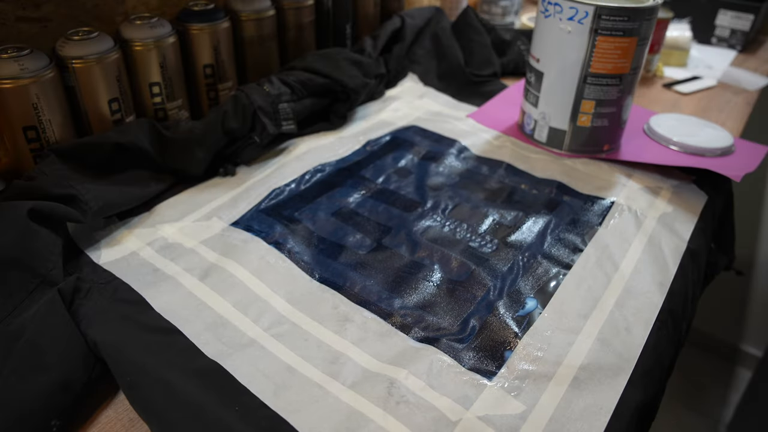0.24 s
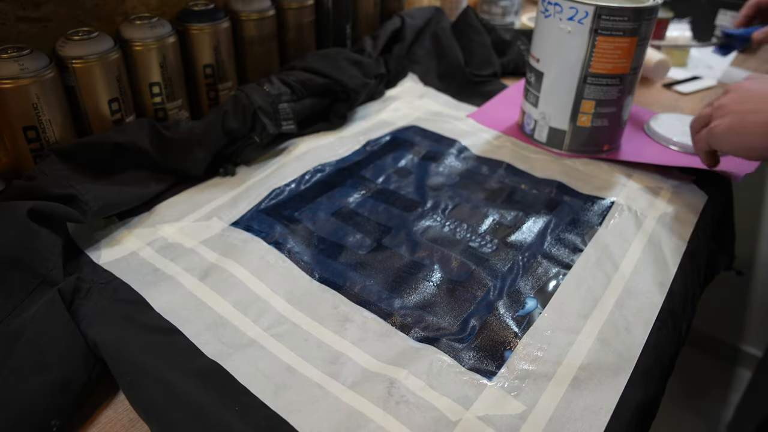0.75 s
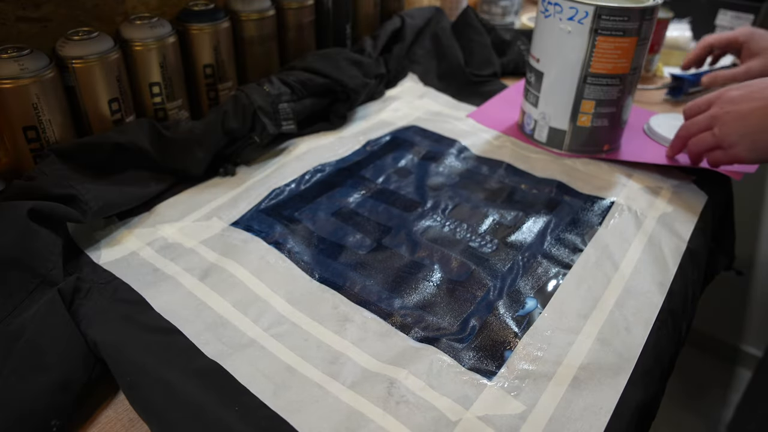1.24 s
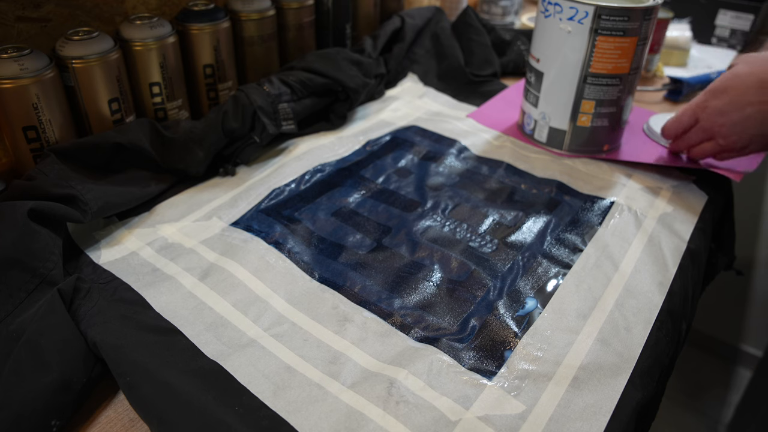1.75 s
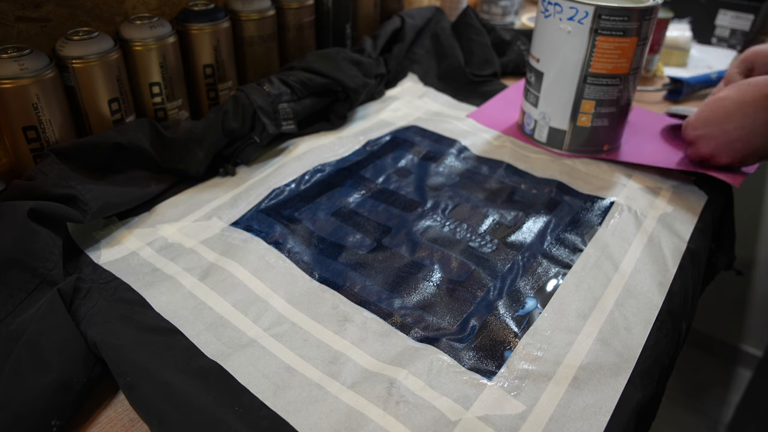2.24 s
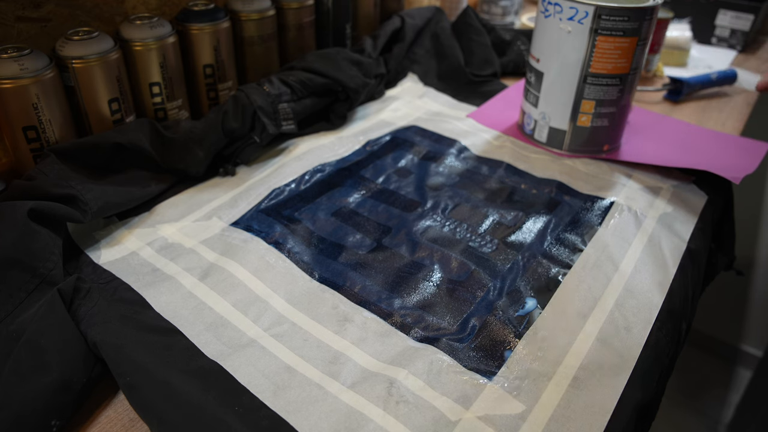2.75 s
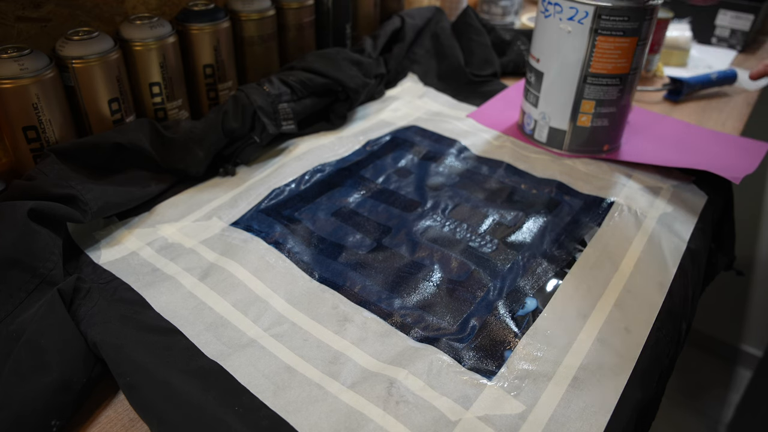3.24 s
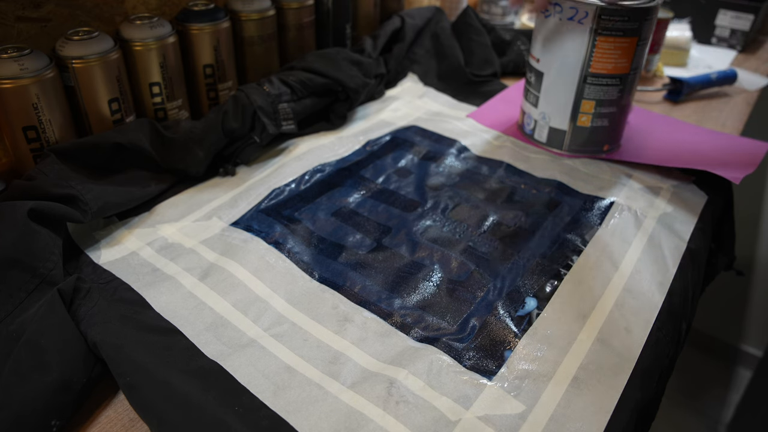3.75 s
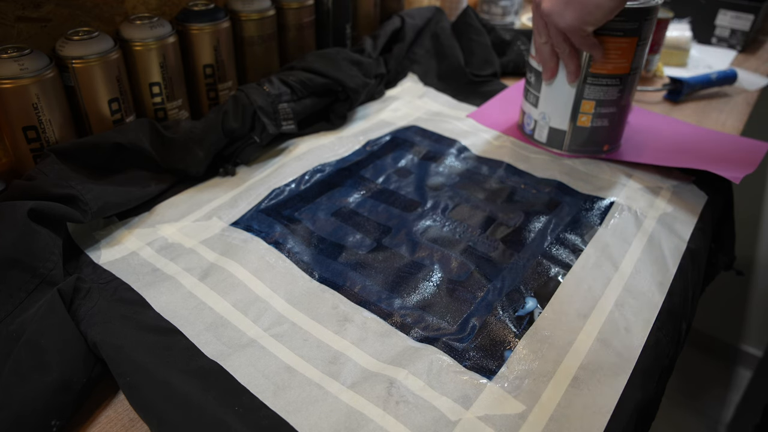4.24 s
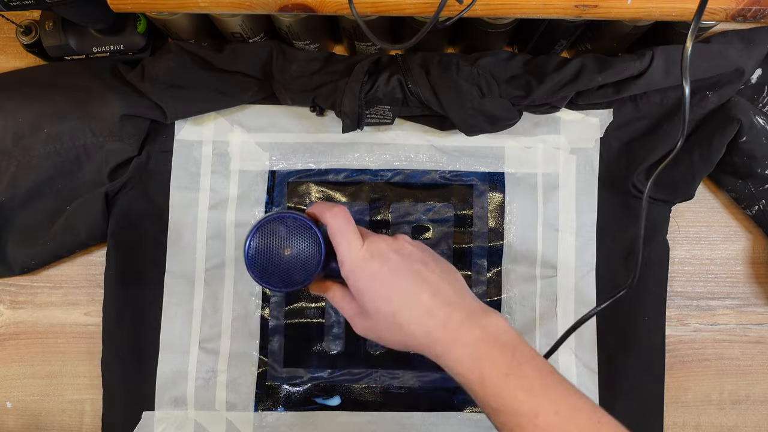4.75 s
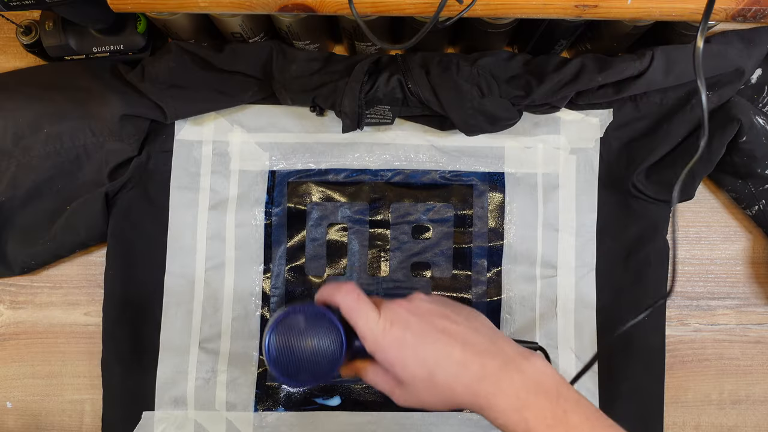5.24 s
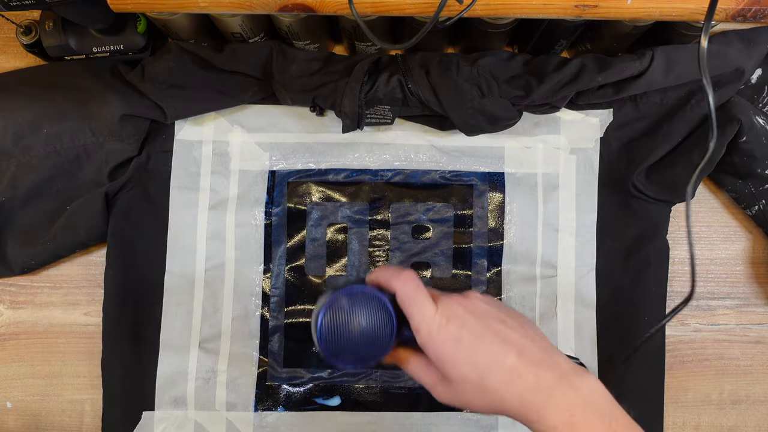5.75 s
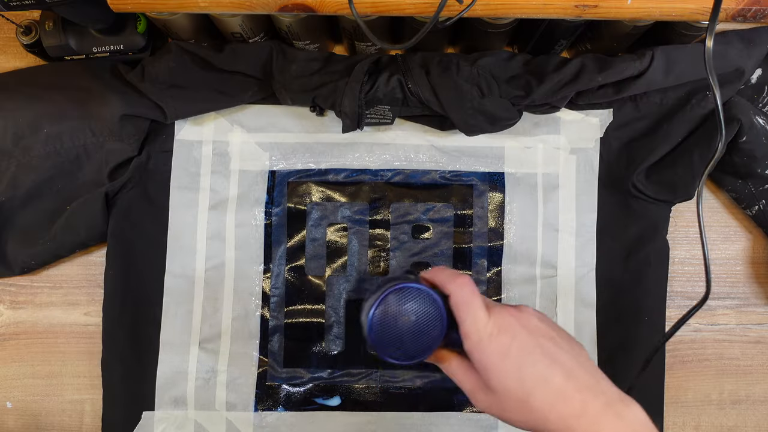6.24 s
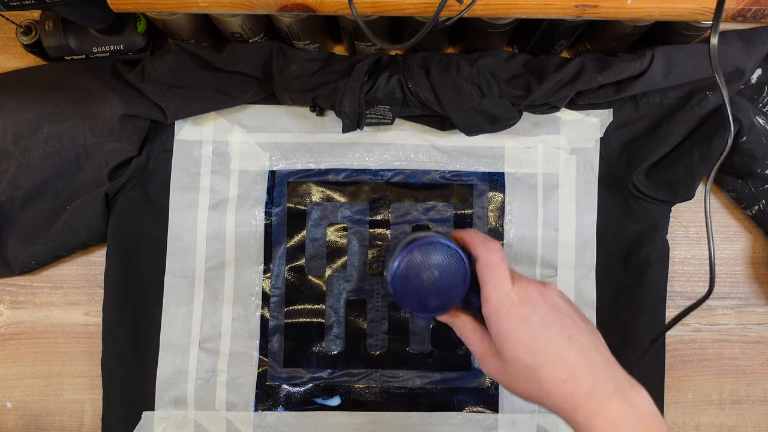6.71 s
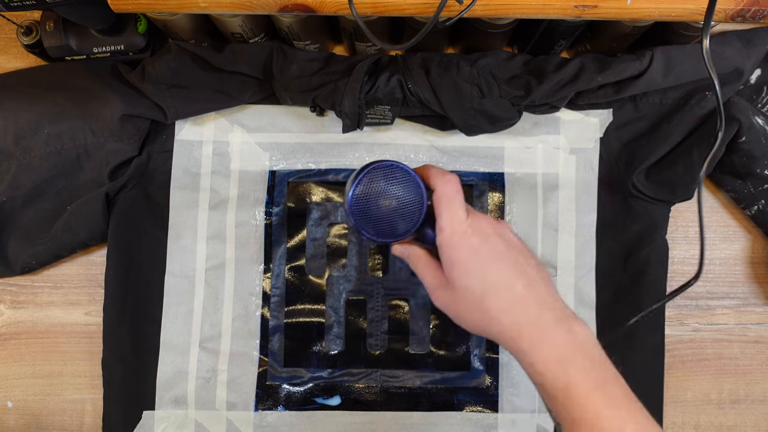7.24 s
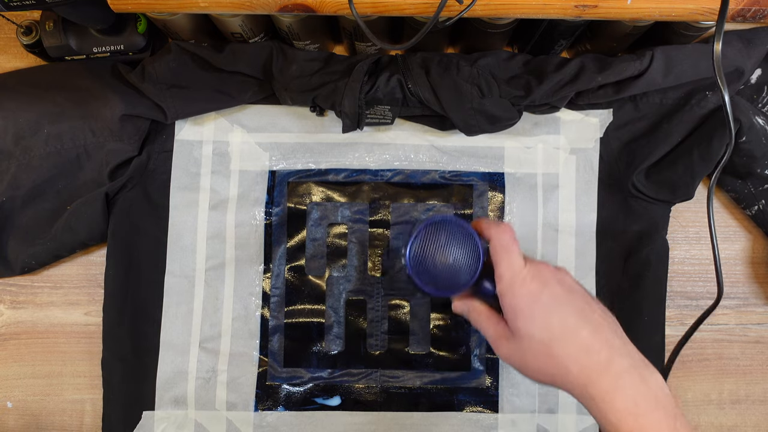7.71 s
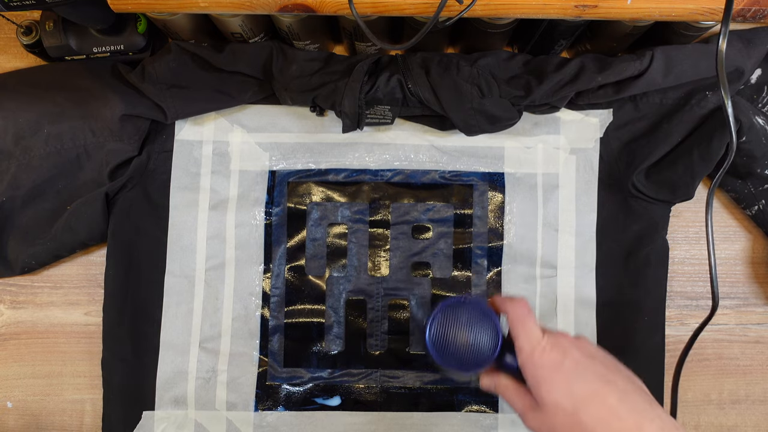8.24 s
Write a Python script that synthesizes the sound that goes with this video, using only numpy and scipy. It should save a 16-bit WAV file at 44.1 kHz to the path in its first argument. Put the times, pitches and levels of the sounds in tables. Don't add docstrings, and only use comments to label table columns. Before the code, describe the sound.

At a quiet workshop table, light handling and a ringing metal lid give way abruptly to a hollow knock and steady, whining hair dryer blast.

```python
import sys
import numpy as np
from scipy import signal
from scipy.fft import rfft, irfft
from scipy.io import wavfile
from scipy.ndimage import uniform_filter1d

SR = 44100
rng = np.random.default_rng(int(sys.argv[2]) if len(sys.argv) > 2 else 0)


def transcribe(u):
    v = np.clip(np.atleast_2d(u).T, -1, 1)
    q = np.round(v * 32767).astype(np.int16)
    wavfile.write(sys.argv[1], SR, q)


def volts_from_db(level):
    exponent = np.asarray(level, float) / 20
    return 10 ** exponent


N = 373968
T = np.arange(N) / SR
CUT_S, KNOCK_S = 4.4712, 4.5272

# start_s, length_s, level_db, brightness_db per band, low_grains_db
RUSTLE = [(-.05, 0.23, -61, 4, -1), (0.21, 0.24, -62, 2.5, 5), (.5, 0.28, -64.5, -4, 2),
          (0.697, 0.19, -56.5, 5, -9), (0.9, 0.22, -61, -4, 1), (1.154, 0.13, -53, 1, 3),
          (1.36, 0.32, -53, -3, 6), (1.64, 0.041, -57, 1, 2), (1.72, 0.24, -69, -6, -8),
          (1.931, 0.12, -54.5, 2.5, -6), (2.04, 0.19, -56.5, 4.5, -6), (2.304, 0.046, -54, 4, 0),
          (2.358, .016, -65, 16, -14), (2.42, 0.18, -66.5, -0.5, 6), (3.2, 0.094, -68, -17, 17),
          (3.075, 0.085, -57, -12, 3), (3.481, 0.11, -66.5, 6, -4), (3.82, 0.21, -67.5, 4, -4),
          (4.035, 0.17, -57, -6, 5.5), (4.2, 0.18, -61, -1, 1)]
CLOTH_DB = [-12.5, -1, -7.5, -26]
# pitch_hz, density_db per Hz
SHOP = [(15, -26), (25, 0.5), (166, -6.5), (476, -1.5), (887, -9.5), (1290, -12.5), (3250, -18),
        (4140, -18), (14800, -36), (16000, -25)]
# start_s, peak_db, ring_hz, upper_ring_hz, upper_ring_db
TICKS = [(0.078, -36.5, 1090, 2050, -22), (0.095, -40, 1080, 2900, -3), (0.119, -18, 1240, 2030, -5),
         (0.1189, -21.5, 1950, 2700, -27), (0.169, -41, 1750, 2830, 0), (0.224, -45, 1060, 2850, -17),
         (.283, -58, 1300, 2200, 0), (0.313, -42.5, 912, 3020, -23), (0.374, -56.5, 501, 2640, 7),
         (0.419, -44, 458, 2610, -13), (0.469, -33, 1120, 2050, -30), (0.473, -37, 1180, 2050, -30),
         (.501, -40, 910, 2050, -16), (0.509, -32.5, 1330, 2500, 1.5), (0.544, -31, 1110, 2300, -15),
         (.548, -37, 1220, 2300, -25), (0.696, -33, 1350, 2310, -20), (1.099, -48, 670, 2430, 7.5),
         (1.195, -28.5, 1250, 2000, -8), (1.222, -36, 1400, 2050, -6), (1.229, -36, 1270, 2050, -20),
         (2.243, -31.5, 1100, 2000, -20), (3.453, -49, 1690, 2650, -10), (3.813, -45, 1310, 2400, -7),
         (3.955, -43, 1600, 2300, -14), (3.961, -42, 1430, 2300, -20), (4.033, -53, 1400, 2300, -10),
         (4.372, -42, 1650, 3560, -2.5), (4.398, -42, 905, 2360, -20)]
# start_s,
# peak_db, thump_hz, edge_db, deep_thud_db
BUMPS = [(0.329, -57, 207, -11, 6), (0.779, -52.5, 213, 5, -13), (1.046, -56, 336, -5, -21),
         (1.598, -44.5, 185, 1, 1), (1.66, -47, 90, -4, 0), (1.77, -60, 85, -6, 0),
         (3.2, -54, 340, -12, -20), (3.262, -50, 340, -10, -22), (3.287, -37, 326, -15, -26),
         (3.301, -41, 310, -20, -15), (3.329, -46.5, 252, -22, -5), (3.457, -41, 235, -16.5, -30),
         (3.487, -46, 230, -21, -27), (3.807, -39.5, 333, -1.5, -8), (3.813, -42, 353, -5, -5),
         (3.949, -35, 200, -0.5, -10), (3.956, -33.5, 175, -8.5, -7), (4.039, -55, 328, 1, -2),
         (4.111, -51, 336, -3, -5), (4.375, -55.5, 252, 10, 0)]
# start_s, peak_db
CABLE = [
    (4.751, -52.5),
    (5.078, -57),
    (5.859, -51.5),
]
# pitch_hz, level_db, t60_s
ROLLER = [(84, -2, 0.13), (182, -3, 0.12), (350, -7.5, 0.1), (606, -7.5, 0.05), (963, -13, 0.059),
          (1120, -10.5, 0.034), (1530, -11, 0.031), (2210, -11.5, 0.052), (2940, -7, 0.033),
          (3880, -20, 0.044), (4850, -26, 0.018), (5780, -16.5, 0.071), (6300, -19, 0.05),
          (7120, -18.5, 0.03)]
# start_s, length_s, grind_db, hiss_db
DRAG = [
    (1.7, 0.043, -53, -85),
    (1.75, .05, -56, -85),
    (1.8, 0.053, -59, -85),
    (1.872, .04, -57, -87),
    (1.94, 0.063, -63, -64),
    (2.046, 0.16, -81, -57.5),
    (2.221, 0.018, -41, -65),
    (2.242, 0.012, -44, -73),
    (2.265, 0.02, -46, -77),
    (2.283, 0.048, -34, -47),
]
# start_s, peak_db
LID_TAPS = [
    (2.3317, -23.5),
    (2.3366, -27),
    (2.3489, -28),
    (2.368, -43),
]
# pitch_hz, level_db, t60_s
RIM = [(602, -10, .15), (910, -11, 0.14), (1276, 1, .06), (1502, -14, .2), (1620, -3.5, .22),
       (2014, -9, .09), (2870, -20, .15), (3750, -14, .04)]
# start_s, peak_db
LID_BLOWS = [
    (2.9413, -5),
    (3.4535, -54),
]
# pitch_hz, level_db, t60_s
LID = [(484, -7.5, .36), (985, -12.5, .2), (1140, -8, 0.15), (1279, -4.5, 0.22), (1378, -10, .25),
       (1617, -1, 0.35), (1965, -13, .19), (2400, -4.5, 0.28), (2570, 0, .28), (2939, -9.5, .22),
       (3054, -7, .33), (3155, -11, 0.13), (3759, -2, 0.27), (3994, -4, 0.32), (4476, -16, 0.19),
       (5152, -12.5, .2), (6000, -13, 0.26), (6476, -15, 0.24), (6670, -12.5, .22), (7806, -26, 0.15)]
# start_s, pitch_hz, level_db
DRYER = [(4.48, 1387, -32), (4.72, 1390, -34), (5.04, 1396, -30), (5.17, 1389, -34), (5.3, 1388, -32),
         (5.37, 1383, -37), (5.56, 1382, -35), (5.8, 1379, -37), (6.3, 1376, -38), (6.7, 1374, -36),
         (6.8, 1373, -32), (7.02, 1374, -31), (7.3, 1378, -32.5), (7.6, 1384, -30.5), (7.88, 1385, -36),
         (7.98, 1385, -32.5), (8.48, 1379, -36)]
# start_s, level_db, width_s
NULLS = [(4.74, -2, 0.017), (5.17, -3, .035), (5.75, -5, 0.016), (6.03, -3, 0.043), (6.3, -8, .015),
         (6.742, -13, .015), (6.89, -8, 0.04), (7.11, -19, 0.018), (7.145, -8, .018), (7.2, -2, 0.01),
         (7.4, -13, 0.023)]
# multiple of shaft rate, level_db against the blade tone, smear_rad, flutter_db
WHINE = [(1, -19.5, 0.39, 3.5), (5, -7, 0.84, -0.5), (8, -10.5, 0.69, 1), (11, -14, 1.2, 1.5),
         (14, -17.5, 0.44, 2.5), (21, -21, 1.2, 2.5), (28, -25, .9, 4.5)]
# pitch_hz, density_db per Hz
AIR = [(35, -58), (60, -33), (140, -23.5), (250, -15), (520, -8), (800, -4.5), (1250, -4.5), (2000, -7),
       (3200, -13.5), (6500, -18.5), (8800, -26), (10000, -29.5), (13500, -29.5), (16000, -41)]
# pitch_hz, width_hz, level_db
BARREL = [(780, 72, 5.5), (895, 60, 4.5), (1100, 110, 2), (1330, 60, -1.5), (1510, 99, -2.5),
          (2970, 97, 4.5), (3464, 180, 4.5), (4060, 270, 6.5), (4830, 220, 4.5), (5690, 1000, 4),
          (8640, 1850, 8.5)]
# start_s, pitch_hz, level_db against the air,
# share cancelled just below
GAP = [(4.47, 2256, -5.5, 0.18), (5.0, 2132, -1, 0.14), (5.5, 2034, -4, 0.37), (6.0, 2038, 0, 0.62),
       (6.3, 2104, 1, .7), (6.6, 2242, -4, 0.63), (6.9, 2300, -7, 0.41), (7.05, 1956, -5, .1),
       (7.25, 2090, 3, 0.65), (7.5, 2268, -2.5, 0.38), (8.0, 2263, -2, 0.5), (8.2, 2360, 1.5, 0.36),
       (8.48, 2154, -5, 0.16)]
# pitch_hz, level_db, t60_s
BLOW = [(700, 9, 0.019), (1660, -4.5, 0.068), (1250, -6, 0.02), (1990, -6, 0.036), (2270, -2.5, 0.018),
        (3380, -10.5, 0.035), (4330, -16, .012), (252, -16, 0.017), (56.3, -29, 0.5), (30, -23, 0.27)]
# start_s, peak_db
SLAPS = [(4.538, -10), (4.5525, -5), (4.566, -11), (4.5752, 2.5), (4.584, -7), (4.597, -13), (4.606, -11),
         (4.6155, -6), (4.626, -14), (4.644, -20), (4.653, -21), (4.669, -21), (4.681, -18)]
# pitch_hz, density_db per Hz
KNOCK_BODY = [(24, -59), (40, -27), (184, -14.5), (264, -16), (490, -7.5), (579, -12), (701, -4), (829, -3),
              (1030, -9), (1430, -12), (2260, -19), (3470, -22.5), (12000, -44), (15600, -76),
              (22000, -120)]
# pitch_hz, level_db, t60_s
CAVITY = [(728, 3, 0.1), (743, -1, 0.15), (835, -6, 0.24), (570, -23, 0.104)]
# start_s, pitch_hz
SPLITS = [(4.5, 4800), (4.54, 7000), (5.27, 5000), (5.27, 12000), (6.39, 5000), (6.39, 8800), (6.62, 13800),
          (6.78, 7200), (6.97, 6300), (6.97, 12500), (7.53, 5500), (7.9, 4700), (7.9, 10000), (7.9, 15000)]


def unit(x):
    return x / np.sqrt(np.mean(x ** 2))


def colour(x, points):
    hz, db = np.transpose(points)
    f = np.log(np.fft.rfftfreq(len(x), 1 / SR) + 1)
    return irfft(rfft(x) * volts_from_db(np.interp(f, np.log(hz), db)), len(x))


def band(x, lo_hz, hi_hz):
    return signal.sosfilt(signal.butter(2, [lo_hz, min(hi_hz, 20000)], "band", fs=SR, output="sos"), x)


def walk(rate):
    k = int(SR / rate)
    steps = np.repeat(rng.standard_normal(N // k + 1), k)
    return 1.256 * uniform_filter1d(uniform_filter1d(steps, k), k)[:N]


def curves(table, silent=-120):
    s, *columns = np.transpose(table)
    return [np.interp(T, s, c, silent, silent) for c in columns]


def ring(modes, scatter_db=0.):
    hz, db, t60 = np.array(modes, float).T[:, :, None]
    t = T[:min(int(1.5 * t60.max() * SR) + 999, SR // 2)]
    db = db + scatter_db * rng.standard_normal(db.shape)
    sign = (-1.) ** np.arange(len(db))[:, None]
    decay = volts_from_db(db - 60 * t / np.maximum(t60, .005))
    y = np.sum(sign * decay * np.sin(2 * np.pi * hz * t), axis=0)
    return np.r_[y, np.zeros(SR // 2 - len(y))] / np.abs(y).max()


def crack(lo_hz, hi_hz, t60):
    y = np.zeros(SR // 2)
    n = min(int(1.5 * t60 * SR) + 999, len(y))
    y[:n] = unit(band(rng.standard_normal(n), lo_hz, hi_hz)) * volts_from_db(-60 * T[:n] / t60)
    return y


def rattle(modes, spread=.05):
    y = sum(volts_from_db(db) * crack(hz / (1 + spread), hz * (1 + spread), t60) for hz, db, t60 in modes)
    return y / np.abs(y).max()


def soften(sound, contact_s):
    return sound * np.minimum(T[:len(sound)] / contact_s, 1) ** 2


def swell(start, length, rise, t60):
    up = np.clip((T - start) / rise, 0, 1) ** 2
    return up * volts_from_db(-60 * np.clip((T - start - length) / t60, 0, 3))


def add(out, s, sound):
    i = int(s * SR)
    out[i:i + len(sound)] += sound[:N - i]


def room(x, t60=0.31, wet_db=-9):
    tail = crack(150, 1800, t60) + volts_from_db(-1) * crack(2000, 4500, .9 * t60) + volts_from_db(4.0) * crack(4500, 12000, t60)
    tail = np.r_[np.zeros(int(.004 * SR)), tail]
    return x + volts_from_db(wet_db) * signal.fftconvolve(x, tail / np.linalg.norm(tail))[:N]


def rustle():
    grains = rng.standard_normal(N) * volts_from_db(.6 * walk(40) + 1.8 * walk(400))
    edges_hz = [(200, 510), (700, 3090), (2200, 7100), (6000, 14500)]
    moves = np.array([swell(s, length, 0.32 * length, 2.5 * length) for s, length, *_ in RUSTLE])
    db, bright_db, low_db = np.transpose(RUSTLE)[2:]
    cloth = np.zeros(N)
    for k, (lo_hz, hi_hz) in enumerate(edges_hz):
        tilt_db = (k - 1) * bright_db if k else low_db
        cloth += volts_from_db(db + CLOTH_DB[k] + tilt_db) @ moves * unit(band(grains, lo_hz, hi_hz))
    return cloth + volts_from_db(-63.5) * unit(colour(rng.standard_normal(N), SHOP))


def ticks():
    out = np.zeros(N)
    for s, db, hz, high_hz, high_db in TICKS:
        t60 = 0.026 * (1 - 0.038 * max(db + 25.0, 0))
        low = ring([(hz, 0, t60), (hz * 1.226, -4, t60), (hz * 1.44, -4, 0.3 * t60),
                    (hz * 0.654, -9, t60)], scatter_db=-2.0)
        high = rattle([(high_hz, 0, t60), (high_hz * 1.53, -3, t60), (high_hz * 1.93, -4, t60),
                       (high_hz * 2.5, -14, .6 * t60)], spread=0.09)
        high = high + volts_from_db(-8) * crack(840, 2800, 0.44 * t60)
        contact_s = min(0.00064 * volts_from_db(-db - 23.5), .0015)
        add(out, s, volts_from_db(db) * soften(low + volts_from_db(high_db + 2.0) * high, contact_s))
    return out


def bumps():
    out = np.zeros(N)
    t60 = 0.065
    for s, db, hz, edge_db, deep_db in BUMPS:
        thud = crack(0.66 * hz, 1.07 * hz, t60) + volts_from_db(-1.0) * ring([(hz, 0, t60)])
        thud = thud + volts_from_db(deep_db) * crack(53, 156, 1.9 * t60)
        edge = crack(280, 1800, 0.065) + volts_from_db(-12) * crack(2000, 5800, .04)
        add(out, s, volts_from_db(db - 1.0) * soften(thud + volts_from_db(edge_db) * edge, 0.0029))
    for s, db in CABLE:
        add(out, s, volts_from_db(db) * crack(40, 117, 0.75))
    return out


def roller():
    drop_s, flight_s, rebound = 1.2541, .0755, .795
    drum_loss_db, clack_loss_db = -6.5, -8.5
    out = np.zeros(N)
    shrink = rebound ** np.arange(9)
    landings_s = drop_s + flight_s * (np.cumsum(shrink) - shrink)
    boom = soften(ring([ROLLER[0], (108, 0, .09)]), 0.0067)
    knocks = ring(ROLLER[1:4]) + volts_from_db(-8) * rattle(ROLLER[1:4], spread=0.12)
    drum = volts_from_db(-0.5) * soften(knocks, 0.0023) - volts_from_db(-3.0) * boom
    for s, halved in zip(landings_s, -np.log2(shrink)):
        clack = rattle(ROLLER[4:], spread=0.055) + volts_from_db(-5.5) * ring(ROLLER[4:], scatter_db=6.0)
        clack = clack + volts_from_db(-10.5) * crack(530, 6500, 0.039) + volts_from_db(-18) * crack(10600, 15000, 0.011)
        landing = volts_from_db(drum_loss_db * halved) * drum + volts_from_db(1.0 + clack_loss_db * halved) * clack
        add(out, s, volts_from_db(-22.5) * soften(landing, 0.00052))
    return out


def lid():
    rings, clatter = np.zeros(N), np.zeros(N)

    rim = [(hz, db, min(t60, .3)) for hz, db, t60 in RIM]
    pulls = np.array([swell(s, length, length, 0.13) for s, length, *_ in DRAG])
    grind, rub = volts_from_db(np.transpose(DRAG)[2:]) @ pulls
    grit = rng.standard_normal(N) * volts_from_db(1.9 * walk(150))
    held = ring(rim[:2] + [(1090, -6, 0.097), (1290, -14, .04)] + rim[5:6])
    rings += volts_from_db(-24.5) * signal.fftconvolve(grit * grind, held)[:N]
    hiss = unit(band(band(grit, 5500, 9800), 5000, 10000))
    scrape = grind * volts_from_db(-6.0) * unit(band(grit, 880, 1540)) + rub * hiss

    for s, db in LID_TAPS:
        add(rings, s, volts_from_db(db - 7.5) * soften(ring(rim), 0.0014))

    sheet = [(hz, db, min(t60, .4)) for hz, db, t60 in LID]
    loose = [(hz, db, 0.26 * t60) for hz, db, t60 in sheet]
    fine_hz = 900 + np.cumsum(rng.uniform(30, 170, size=80))
    fine = [(hz, -.0018 * hz, .24 - .000012 * hz) for hz in fine_hz]
    for s, db in LID_BLOWS:
        can = volts_from_db(-24) * crack(420, 620, 0.31) + volts_from_db(-31) * crack(130, 410, 0.39)
        can = can + volts_from_db(-5.5) * crack(760, 4800, 0.017) + volts_from_db(-16.5) * crack(780, 4200, 0.15)
        can = can + volts_from_db(-24.5) * crack(4600, 6500, 0.21)
        can = can + ring([(1250, 2.5, 0.022), (2700, 2.5, .045), (3100, -2, 0.027),
                          (3800, -7.0, .015), (5070, -5, .015)])
        clang = volts_from_db(-6.5) * soften(ring(sheet), .006) + volts_from_db(-12.5) * rattle(sheet, spread=.008)
        clang = clang + volts_from_db(-11.5) * soften(ring(fine, scatter_db=7.5), 0.0018)
        add(rings, s, volts_from_db(db) * clang)
        add(clatter, s, volts_from_db(db - 0.5) * (rattle(loose, spread=0.083) + can))
    return rings + room(clatter + scrape)


def resonate(x, peaks):
    f = np.fft.rfftfreq(len(x), 1 / SR)
    lift_db = sum(db / (1 + (2 * (f - hz) / width) ** 2) for hz, width, db in peaks)
    return irfft(rfft(x) * volts_from_db(lift_db), len(x))


def standing(x, t60=0.19, share=0.21, lo_hz=130, hi_hz=3500):
    lean = np.pi / 2 * np.cumsum(np.abs(walk(1.489))) / SR * 2.6
    tails = [crack(lo_hz, hi_hz, t60) for _ in range(2)]
    first, second = (signal.oaconvolve(x, tail / np.linalg.norm(tail))[:N] for tail in tails)
    return x + share * (np.cos(lean) * first + np.sin(lean) * second)


def dip(x, hz, share):
    spin = np.exp(2j * np.pi * np.cumsum(hz) / SR)
    k = int(SR / 126 / 3)
    inside = np.real(spin * uniform_filter1d(uniform_filter1d(x / spin, k), k))
    return x - np.clip(share, 0, 1) * 2 * inside


def dryer():
    blades = 7
    s, *columns = np.transpose(DRYER)
    blade_hz, blade_db = (np.interp(T, s, c) for c in columns)
    blade_db = blade_db + sum(db * np.exp(-((T - at_s) / width) ** 2) for at_s, db, width in NULLS)

    air_db = -37 + 2.5 * np.exp(-np.abs(T - KNOCK_S) / 2.1)
    sway = walk(1.05)
    air = np.zeros(N)
    for hz in 40 * 2 ** np.arange(0, 9, .5):
        flicker = volts_from_db(0.24 * sway + 0.54 * walk(15))
        air += band(rng.standard_normal(N), hz / 1.231, hz * 1.116) * flicker
    air = standing(resonate(colour(air, AIR), BARREL))
    air = standing(air, t60=0.039, share=0.21, lo_hz=2400, hi_hz=12200)

    gap_hz, gap_db, cancel = curves(GAP)
    air = dip(air, 0.886 * gap_hz, cancel)
    gap = np.cos(2 * np.pi * np.cumsum(gap_hz) / SR) * unit(band(rng.standard_normal(N), 8.2, 117))
    air = air / np.std(band(air, 2710, 9000)) + volts_from_db(gap_db) * gap

    shaft_hz = uniform_filter1d(blade_hz, SR // 8) / blades * (1 + 0.0005 * walk(40))
    turn = 2 * np.pi * np.cumsum(shaft_hz) / SR
    blade = volts_from_db(blade_db + 2.0 + 1.0 * walk(14)) * np.sin(blades * turn)
    whine = np.zeros(N)
    for k, db, smear, flutter_db in WHINE:
        whine += volts_from_db(db + flutter_db * walk(9)) * np.sin(round(k) * turn + smear * walk(60))
    mains = volts_from_db(-70.5) * unit(band(rng.standard_normal(N), 92.0, 100.6))
    return volts_from_db(air_db) * air + blade + volts_from_db(-32.5) * whine + mains


def knock():
    out = np.zeros(N)
    add(out, KNOCK_S, 1.3 * ring(BLOW))
    add(out, KNOCK_S + .0012, volts_from_db(-8) * crack(1000, 5800, .011) + volts_from_db(-27) * crack(7500, 15000, .008))
    for s, db in SLAPS:
        slap = ring([(730, 0, 0.028), (842, 3, 0.033), (1540, -3.5, 0.035), (1940, -7, .025),
                     (3460, -11.5, 0.018)], scatter_db=1.5)
        add(out, s, volts_from_db(db) * soften(slap, 0.0025))
    shaking = rng.standard_normal(N) * volts_from_db(0.54 * walk(70))
    cavity = unit(signal.fftconvolve(shaking, ring(CAVITY))[:N])
    hollow = unit(colour(shaking, KNOCK_BODY)) + volts_from_db(-3.0) * cavity
    dying = swell(KNOCK_S, 0.074, 0.015, 0.39)
    return out + volts_from_db(-18.5) * dying * hollow / np.std(band(hollow, 580, 1100))


def split(mono):
    half_s = .022
    side, n = np.zeros(N), int(2 * half_s * SR)
    for s, hz in SPLITS:
        i = int((s - half_s) * SR)
        loud = np.std(band(mono[i:i + n], hz / 1.1, hz * 1.1))
        shape = [(hz / 1.13, -60), (hz / 1.12, 0), (hz * 1.12, 0), (hz * 1.13, -60)]
        noise = unit(colour(rng.standard_normal(n), shape))
        add(side, s - half_s, volts_from_db(-1) * loud * np.hanning(n) * noise)
    return np.array([side, -side])


def scene():
    before = T < CUT_S
    hits = bumps()
    table = rustle() + room(ticks(), t60=0.26, wet_db=-10.5) + room(roller() + hits * before) + lid()
    mono = np.where(before, table, dryer() + hits) + knock()
    return np.array([mono, mono])


def roll_off(x):
    return signal.sosfilt(signal.butter(12, 16820, fs=SR, output="sos"), x)


def record(dry):
    x = 0.94 * np.tanh(dry / 0.99) + volts_from_db(-83.5) * rng.standard_normal(dry.shape)
    x = x + split(x[0])
    x = signal.sosfilt(signal.butter(1, 30, "high", fs=SR, output="sos"), x)
    x = signal.sosfilt(signal.ellip(10, .2, 60, 15850, fs=SR, output="sos"), x)
    return roll_off(x)


dry = scene()
out = record(dry)
transcribe(out)
```